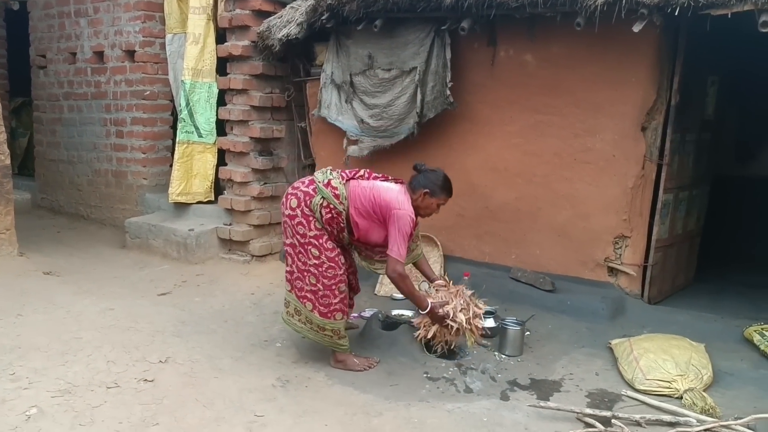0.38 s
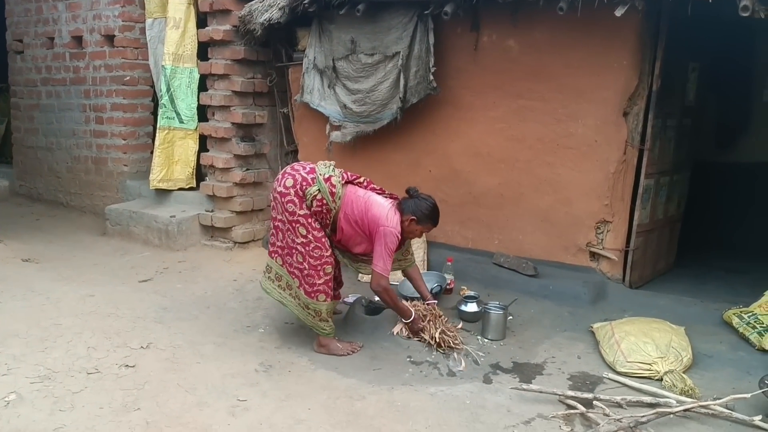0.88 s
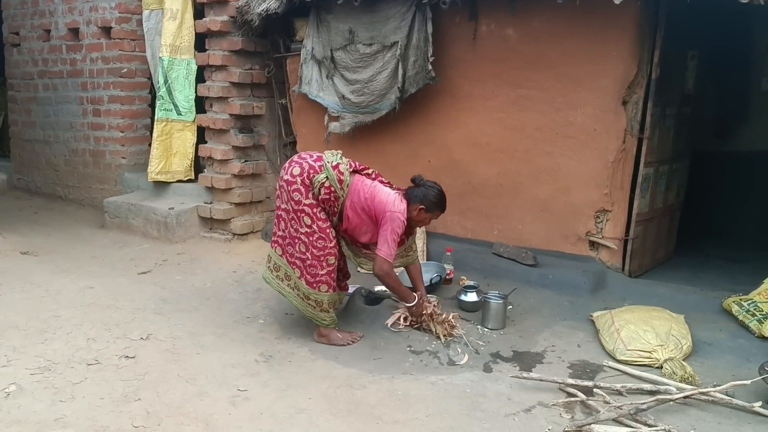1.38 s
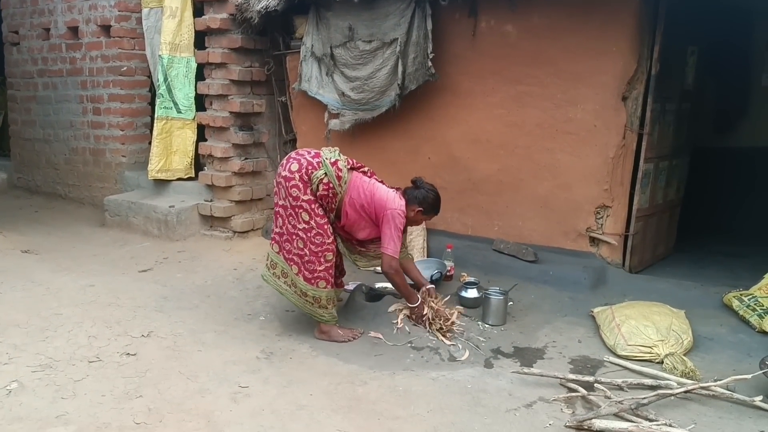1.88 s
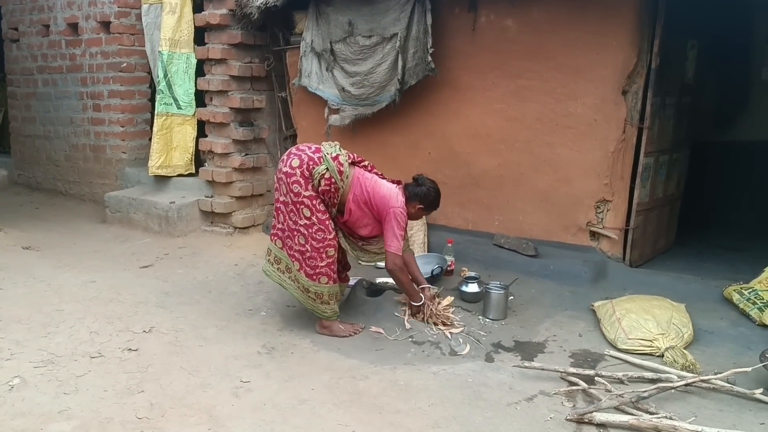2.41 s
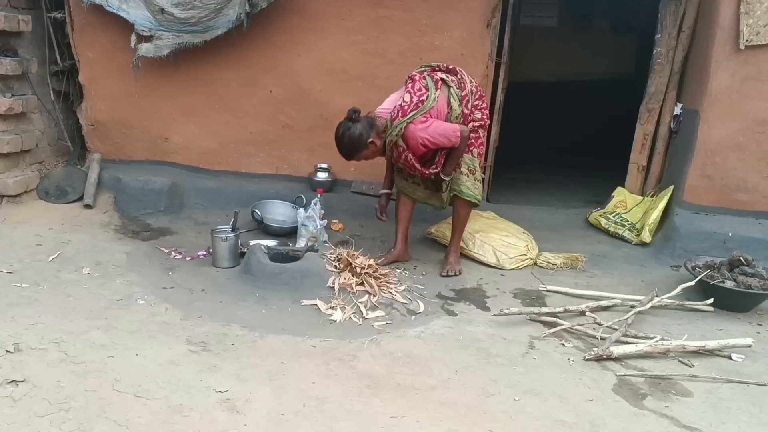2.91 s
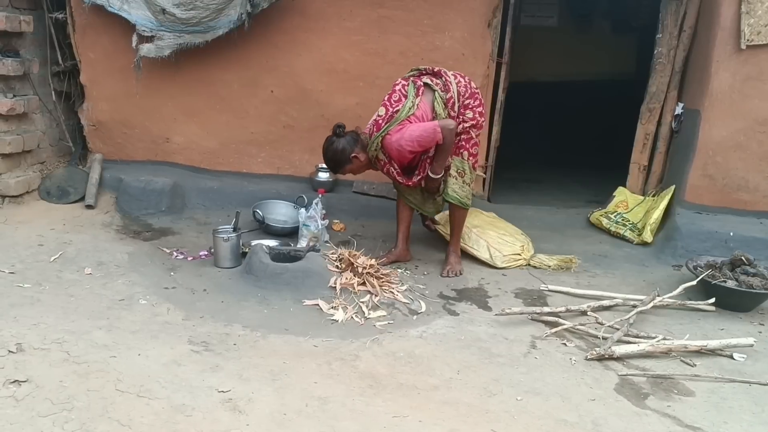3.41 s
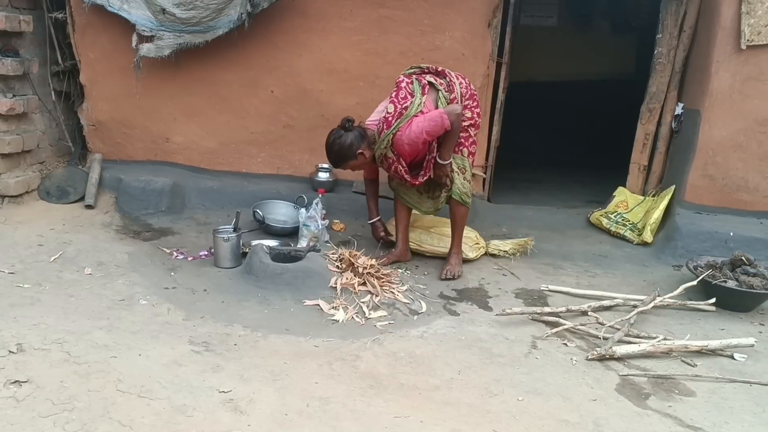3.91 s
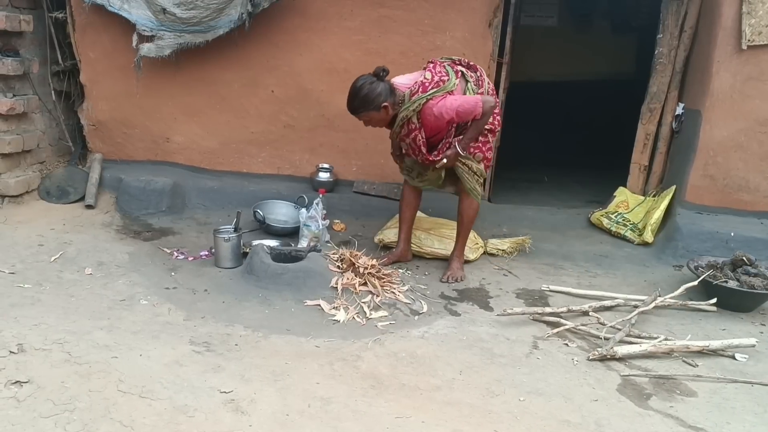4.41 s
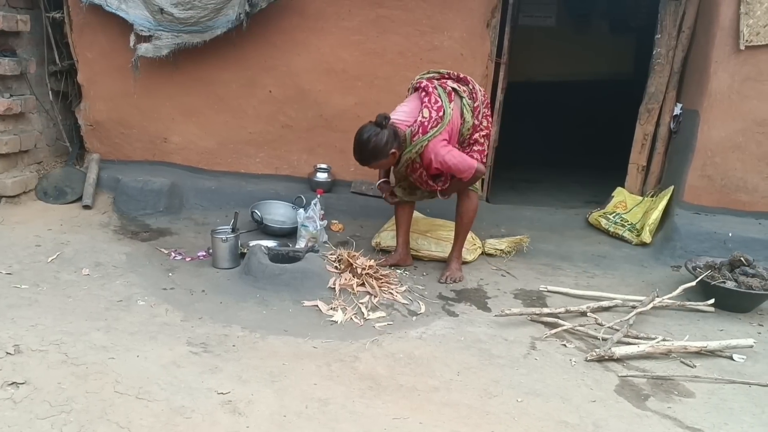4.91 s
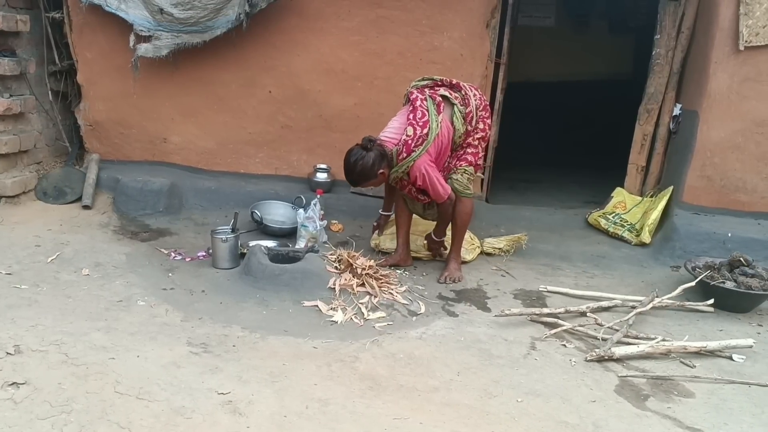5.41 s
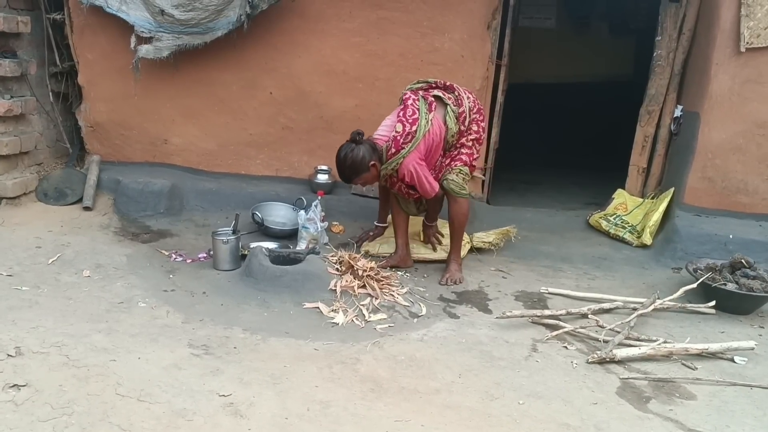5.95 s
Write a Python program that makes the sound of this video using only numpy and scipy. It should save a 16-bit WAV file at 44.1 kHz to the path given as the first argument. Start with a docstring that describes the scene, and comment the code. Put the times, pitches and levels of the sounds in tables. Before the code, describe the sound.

A quiet open yard with very faint airy murmur and a barely audible low drone; short echoes return from ground and mud walls. From 0 s chicks cheep close by, mostly left, in quick falling whistles. Dry husks begin rustling around 0.4 s and crunch strongly at 0.6-0.9, with sharp snaps at 0.78. More bursts come at 1.3-1.5, with snaps and a dull hollow stove boom, then lighter stirring and another crunch at 2.35. A hen clucks and coos at 1.57 and lower at 2.36; a small bird trills at 2.65. At 3.05 the spot changes quickly: chicks become faint, handling much softer. A woven sack scuffs at 3.6-4.2 and 5.5-5.8, with a small pot knock and muffled thump near 4.88. Throbbing rising bird whistles sound at 3.6, 4.1, 4.9, 5.7 and 6.0.

```python
"""Village yard from two spots

First dry husks and leaves are put down and pushed about, then, after a short crossfade to a second spot, a woven
sack is dragged: banded click bursts. Chicks cheep throughout (gliding whistles), a hen clucks and coos softly
(harmonics through a throat resonance), a small bird trills (chopped whistle). A hollow clay stove booms (resonant
noise), stalks snap and a pot is knocked (decaying sines). Noise makes the yard's murmur and a far drone;
ground and walls return short echoes."""
import sys
import numpy as np
from scipy import signal
from scipy.io import wavfile

SR = 44100
rng = np.random.default_rng(int(sys.argv[2]) if len(sys.argv) > 2 else 0)


def linear_from_db(decibels):
    """Turn decibels (scalar or array-like) into linear amplitude factors; 0 gives 1."""
    return 10 ** (np.asarray(decibels, float) / 20)


def store_wav(level_fs):
    """Save 16-bit WAV to argv[1]."""
    pcm = np.round(np.clip(np.atleast_2d(level_fs), -1, 1) * 32767)
    wavfile.write(sys.argv[1], SR, pcm.T.astype(np.int16))


N = 267246

CUT_END_S, CROSSFADE_S = 3.06, .049   # a short crossfade joins the scene at the first spot to that at the second

# yard murmur spectrum: freq_hz, density_db_per_hz
YARD_SPECTRUM = [(18, -42), (30, -2.5), (127, 5.5), (649, -13), (988, -14), (2540, -17.5), (4190, -9.5),
                 (5310, -25), (8300, -52), (10800, -30), (13300, -41), (14800, -35), (16000, -44)]
# murmur level by spot: level_db
YARD_LEVEL_DB = [-66.5, -67.5]
# left-right likeness of yard and rustle: freq_hz, correlation
LIKENESS = [(100, 0.28), (500, 0.35), (2000, 0.34), (8000, 0.084)]
HUM_HZ, HUM_WIDTH_HZ, HUM_DB = 115.6, 8.8, -77.5

# hen clucks and soft coos: start_s, length_s, start_hz, end_hz, level_db
CLUCKS_AND_COOS = [(1.453, .043, 630, 600, -50.5), (1.559, .022, 1100, 1050, -41.5),
                   (1.566, .087, 476, 466, -31), (2.36, .12, 240, 239, -29), (2.967, .11, 746, 700, -63.5),
                   (3.409, .11, 767, 777, -65), (4.291, .11, 797, 807, -65.5)]
HEN_THROAT_HZ, HEN_THROAT_WIDTH_HZ, HEN_PAN_DB = 900, 1000, 3.0   # positive pan: left

# small bird trills: start_s, length_s, start_hz, end_hz, level_db
TRILLS = [(2.636, .22, 2382, 2676, -34), (2.758, .09, 2304, 2176, -34), (3.601, .075, 2643, 2990, -41),
          (4.113, .13, 2753, 3050, -30.5), (4.887, .17, 2640, 3105, -34), (5.431, .26, 2520, 2820, -57),
          (5.675, .15, 2690, 3210, -42), (6.009, .15, 2680, 3350, -31.5)]
TRILL_ATTACK_S, CYCLES_PER_THROB, BIRD_PAN_DB = .014, 9.6, -1.5

# cheeps, and a faint, level whistle of another bird: start_s, length_s, start_hz, end_hz, level_db
CHEEPS = [(.018, .07, 6100, 5130, -59.5), (.003, .17, 2230, 2230, -67), (.07, .06, 7300, 6900, -58),
          (.085, .035, 4400, 3450, -49), (.115, .06, 5800, 4700, -45), (.151, .06, 6150, 5400, -45),
          (.163, .056, 6810, 5130, -51), (.15, .065, 4900, 3400, -33), (.398, .052, 5700, 5000, -51),
          (.4, .055, 7250, 6700, -53), (.455, .04, 4400, 3500, -35), (.48, .05, 4300, 3300, -35),
          (.81, .04, 4200, 4250, -37), (.85, .035, 4600, 3100, -33), (.992, .03, 6520, 6350, -50),
          (1.084, .036, 4500, 3450, -31), (1.135, .04, 4400, 3300, -33), (1.175, .045, 4400, 2800, -31),
          (1.166, .04, 5000, 3900, -34), (1.262, .055, 4750, 4150, -33), (1.438, .03, 4800, 4000, -35),
          (1.488, .061, 4600, 4350, -43), (1.553, .053, 4400, 2960, -38), (1.556, .06, 5000, 4000, -34),
          (1.61, .055, 4500, 3300, -32), (1.58, .05, 4450, 3600, -34), (1.797, .036, 6480, 6340, -50.5),
          (1.86, .035, 4100, 2750, -36), (1.894, .038, 5150, 4200, -33.5), (1.938, .053, 4600, 2840, -34),
          (1.945, .045, 4900, 4200, -33), (2.09, .05, 4400, 4000, -34), (2.126, .045, 4300, 3250, -27),
          (2.175, .035, 4200, 3100, -38), (2.275, .02, 6100, 5900, -46), (2.29, .06, 5200, 3000, -35),
          (2.345, .065, 4200, 3750, -34), (2.478, .035, 4300, 3400, -25), (2.585, .035, 4300, 3250, -39),
          (2.72, .03, 6100, 5000, -48), (2.745, .085, 5000, 3300, -36), (2.85, .07, 5800, 4300, -55),
          (2.827, .076, 3400, 3400, -51), (2.92, .055, 4150, 4110, -36), (2.99, .03, 4250, 4100, -42),
          (3.015, .038, 4200, 3450, -39), (3.01, .029, 5000, 4350, -52.5), (3.14, .08, 5300, 4400, -67),
          (3.154, .11, 6400, 5100, -73), (3.258, .1, 4400, 2950, -65), (3.282, .067, 5300, 5130, -63.5),
          (3.319, .04, 5250, 3650, -56), (3.397, .051, 5400, 3650, -64.5), (3.432, .06, 6500, 6350, -74),
          (3.497, .06, 4480, 4450, -60), (3.526, .07, 3860, 3340, -61), (3.645, .033, 5450, 5100, -67),
          (3.8, .03, 4600, 4100, -63), (3.915, .07, 5600, 5100, -61), (3.94, .035, 4690, 4170, -58),
          (4.166, .055, 4800, 3460, -58.5), (4.2, .11, 5480, 5100, -67), (4.255, .076, 4580, 3480, -67),
          (4.284, .068, 5100, 3550, -61.5), (4.412, .041, 4130, 3480, -62.5), (4.44, .035, 4900, 4000, -54),
          (4.487, .055, 3720, 3150, -65.5), (4.542, .05, 4450, 4020, -63.5), (4.665, .06, 5750, 5300, -55),
          (4.7, .07, 5200, 4450, -58), (4.72, .07, 5350, 5200, -64), (4.785, .06, 4170, 3220, -62),
          (4.882, .063, 5560, 5150, -59.5), (4.923, .018, 5300, 4000, -63), (4.97, .06, 5280, 3800, -67),
          (5.095, .091, 4700, 2980, -72), (5.221, .15, 4100, 3170, -64.5), (5.25, .053, 5000, 3500, -65),
          (5.261, .073, 5630, 4770, -65.5), (5.405, .08, 5350, 5200, -68), (5.543, .048, 4870, 3820, -63.5),
          (5.87, .05, 5400, 5000, -65), (5.962, .07, 4100, 3540, -67), (5.999, .06, 4350, 4100, -59)]
# cheeps that hold their pitch, then fall: start_s, length_s, level_db
HELD_CHEEPS = [(.073, .135, -37), (.39, .115, -39), (.69, .096, -36), (1.051, .12, -36), (1.769, .125, -36),
               (2.406, .11, -44), (2.718, .096, -43)]
HELD_START_HZ, HELD_END_HZ = 4600, 3420
HELD_CHEEP_SHARE, CHEEP_SHARE = .92, .56   # share of the fall still ahead at half time
# loudest far cheeps by spot: level_db
FAR_CHICKS_DB = [-62, -75]
CHICK_THROAT_HZ, CHICK_THROAT_WIDTH_HZ = 3920, 3250
BROOD_PAN_DB, BROOD_PAN_SPREAD_DB = -6.5, 2.5

KNOCK_S, KNOCK_DB = 4.87, -41
# pot modes: freq_hz, level_db, t60_s
POT_MODES = [(700, 7, 0.16), (871, 6, 0.17), (1600, -11, 0.16)]
# snapping stalks, the first one heard again 11 ms later as an echo: start_s, level_db, pan_db
SNAPS = [(.7803, -12, -1), (.7912, -18, -2), (1.4401, -19, 0), (.2423, -50, -1), (.2783, -50, 0),
         (5.372, -50, -1), (.5297, -38, 0), (.5581, -34, -1), (1.352, -26, 0), (1.365, -24, -1),
         (3.735, -50, 0), (4.7127, -50, -6), (5.3313, -56, -1)]
# stalk modes: freq_hz, width_hz, level_db
STALK_MODES = [(1550, 2100, -41), (2300, 500, 24), (3540, 330, 18), (6000, 1500, 29.5), (7840, 1100, -2),
               (10600, 3200, -21), (14290, 2000, -18)]

# stove booms when the ground beside it is jolted: start_s, hold_s, level_db
BOOMS = [(0.0, .04, -64), (.39, .02, -66.5), (.72, .02, -60.5), (.93, .02, -61.5), (1.3, .075, -50.5),
         (1.47, .07, -54.5), (1.84, .03, -68), (2.33, .05, -64), (2.42, .02, -53), (2.63, .02, -63),
         (4.13, .05, -66), (4.71, .02, -71), (4.89, .07, -59), (5.33, .04, -70), (5.57, .02, -52)]
STOVE_HZ, STOVE_WIDTH_HZ = 230, 51   # air in the hollow clay stove
BOOM_RISE_DB_PER_S, BOOM_FADE_DB_PER_S = 260, 330

# drags, and a faint steady low stirring under them: start_s, hold_s, level_db
DRAGS = [(.55, 2.4, -78), (.72, .03, -69), (1.09, .05, -73), (1.33, .045, -56), (1.59, .02, -57.5),
         (2.39, .05, -55), (3.1, 2.96, -88), (3.74, .09, -67), (3.85, .32, -71), (4.02, .03, -66),
         (4.12, .04, -68), (4.71, .01, -77), (4.88, .04, -73), (5.5, .34, -77)]
DRAG_RISE_DB_PER_S, DRAG_FADE_DB_PER_S = 250, 330
SACK_HZ, SACK_WIDTH_HZ, SACK_HUM_DB = 541.4, 130, 6.5   # level relative to the drag
# pushes at husks, later the sack, and a faint steady stirring under them:
# start_s, hold_s, crunch_db, fine_crackle_db, fade_db_per_s
PUSHES = [(0.0, .4, -83, -72, 100), (.43, .04, -74, -61, 100), (.5, .04, -64, -57, 100),
          (.6, .09, -51, -47.5, 100), (.73, .11, -45, -41.5, 70), (1.0, 1.8, -69, -65, 35),
          (1.31, .075, -42, -42, 300), (1.45, .02, -49, -49, 200), (1.52, .11, -53, -56.5, 150),
          (1.83, .03, -51.5, -54, 90), (1.95, .3, -69, -64, 90), (2.35, .07, -44, -48, 200),
          (2.58, .2, -69, -59, 60), (3.1, 2.96, -84, -90, 100), (3.6, .1, -71, -76, 30),
          (3.75, .04, -61.5, -67, 60), (3.85, .33, -64, -74.5, 250), (4.7, .015, -66, -75, 400),
          (4.88, .03, -69, -90, 200), (5.5, .32, -70, -81, 100)]
PUSH_RISE_DB_PER_S = 220
# bands of drag, crunch, fine crackle: low_hz, high_hz
PART_BANDS = [(300, 430), (1150, 2100), (6800, 15500)]
# borders between those parts: freq_hz
PART_EDGES_HZ = [1050, 5000]
# husk spectrum: freq_hz, density_db_per_hz
HUSK_SPECTRUM = [(59, -59), (100, -29), (215, -11), (343, -14.5), (705, -8), (818, -24.5), (1280, 9.5),
                 (1550, 15.5), (3540, 16.5), (4980, -3.5), (5900, -4.5), (8830, -11), (15000, -13),
                 (16000, -6)]
# sack spectrum: freq_hz, density_db_per_hz
SACK_SPECTRUM = [(59, -36), (100, -26), (322, -10.5), (406, -29), (547, -1), (691, -31), (1230, -11),
                 (1390, -19.5), (1950, -11.5), (3320, -16), (9820, -37), (13200, -55), (15000, -37),
                 (16000, -36)]
BASE_GRAINS_PER_S, BURST_GAIN, GRAIN_SPREAD_DB = 3000, .8, 4.0

ECHO_T60_S, ECHO_DB = .16, -3.5
# house wall delay by spot: delay_s
SLAP_DELAY_S = [.0197, .0097]
# house wall level at left, right: level_db
SLAP_LEVEL_DB = [-6, -12]
EAR_LAG_S_PER_DB = 0.00004   # lag at the far port per dB of pan
# microphone peaks and dips: freq_hz, width_hz, gain_db
MICROPHONE = [(5100, 400, -2.5), (6210, 2100, 5), (8530, 750, -4.5), (13500, 2100, -7), (15160, 1400, 12)]


def second_spot():
    """Share of the second spot over time: rises from 0 to 1 in the crossfade."""
    return np.clip((np.arange(N) / SR - CUT_END_S) / CROSSFADE_S + 1, 0, 1)


def at_hz(points, hz):
    """Read a spectrum on a log-frequency axis."""
    freq_hz, value = np.array(points).T
    return np.interp(np.log(hz), np.log(freq_hz), value)


def density_db(spectrum, hz, band_hz):
    """Gain at hz that gives white noise of rms 1 a level of 0 dB in the band."""
    grid_hz = np.linspace(*band_hz, num=200)
    mean_power = np.mean(linear_from_db(at_hz(spectrum, grid_hz)) ** 2)
    return at_hz(spectrum, hz) - 10 * np.log10(mean_power * (band_hz[1] - band_hz[0]) * 2 / SR)


def drift(rate_hz):
    """Slow curve through normal random points, two per cycle of rate_hz."""
    knots = np.arange(0, N + SR, SR / rate_hz / 2)
    return np.interp(np.arange(N), knots, rng.standard_normal(len(knots)))


def wobble(size, points_per_s):
    """Short curve through normal random points."""
    return np.interp(np.arange(size) * points_per_s / SR, np.arange(200), rng.standard_normal(200))


def flutter(size, points_per_s, depth_db):
    """Wavering gain of mean power 1."""
    gain = linear_from_db(depth_db * wobble(size, points_per_s))
    return gain / np.sqrt(np.mean(gain ** 2))


def tone(hz):
    """Sine whose phase is the running sum of its frequency."""
    return np.sin(2 * np.pi * np.cumsum(hz) / SR)


def resonant_noise(hz, width_hz):
    """Noise twice through one resonance; rms 1."""
    r = np.exp(-np.pi * width_hz / SR)
    section = [1, 0, -1, 1, -2 * r * np.cos(2 * np.pi * hz / SR), r * r]
    sound = signal.sosfilt([section, section], rng.standard_normal(N))
    return sound / sound.std()


def ring(modes, size):
    """Decaying sines of freq_hz, level_db, t60_s with random strength and phase; peak 1."""
    t = np.arange(size) / SR
    sound = np.zeros(size)
    for hz, db, t60_s in modes:
        decay = linear_from_db(db + rng.normal(0, 2) - 60 * t / t60_s)
        sound += decay * np.sin(2 * np.pi * (hz * t + rng.random()))
    return sound / np.abs(sound).max()


def add(out, start_s, sound, pan_db):
    """Mix in a short sound, louder and earlier on the near side."""
    for side, sign in enumerate((.5, -.5)):
        lag_s = max(-2 * sign * pan_db, 0) * EAR_LAG_S_PER_DB
        at = round((start_s + lag_s) * SR)
        out[side, at:at + len(sound)] += (sound * linear_from_db(sign * pan_db))[:max(N - at, 0)]


def strokes(rows, rise_db_per_s):
    """Power sum of swells that rise, hold and fade; those begun at the first spot end in the crossfade."""
    t = np.arange(0, N, 32) / SR
    first = np.clip((CUT_END_S - t) / CROSSFADE_S, 0, 1)
    power = np.zeros(len(t))
    for start_s, hold_s, db, fade_db_per_s in rows:
        rise_db = rise_db_per_s * np.maximum(start_s - t, 0)
        fade_db = fade_db_per_s * np.maximum(t - start_s - hold_s, 0)
        gate = first ** 2 if start_s < CUT_END_S else 1
        power += linear_from_db(db - rise_db - fade_db) ** 2 * gate
    return np.interp(np.arange(N) / SR, t, np.sqrt(power))


def wide_bands(streams, gain_at):
    """Shape four streams in narrow log-spaced bands; mid and side shares set the left-right likeness."""
    pairs = streams.reshape(2, 2, N)
    out = np.zeros((2, N))
    edges_hz = np.geomspace(45, 17000, num=23)
    for k, (low, high) in enumerate(zip(edges_hz, edges_hz[1:])):
        hz = np.sqrt(low * high)
        band = signal.butter(2, [low, high], "band", fs=SR, output="sos")
        mid, side = signal.sosfilt(band, gain_at(hz) * pairs[k % 2])   # neighbour bands use other streams
        alike = np.clip(at_hz(LIKENESS, hz), -1, 1)
        out += np.sqrt(1 + alike) * mid + np.sqrt(1 - alike) * side * [[1], [-1]]
    return out / np.sqrt(2)


def far_drone():
    """Faint far drone: narrow resonant noise."""
    return linear_from_db(HUM_DB) * resonant_noise(HUM_HZ, HUM_WIDTH_HZ)


def yard_murmur():
    """Wide noise with the yard's spectrum, each band drifting slightly."""
    level = linear_from_db(YARD_LEVEL_DB[0] + (YARD_LEVEL_DB[1] - YARD_LEVEL_DB[0]) * second_spot())

    def gain_at(hz):
        return level * linear_from_db(density_db(YARD_SPECTRUM, hz, (30, 16000)) + 0.5 * drift(4.6))

    return wide_bands(rng.standard_normal((4, N)), gain_at)


def clucks_and_coos():
    """Harmonics of a slightly unsteady pitch, weighted by one throat resonance."""
    out = np.zeros((2, N))
    for start_s, length_s, start_hz, end_hz, db in CLUCKS_AND_COOS:
        u = np.linspace(0, 1, round(length_s * SR))
        unsteady = 1 + 0.029 * (1 - u) ** 5.8 + 0.0089 * wobble(len(u), 60.0)
        turns = np.cumsum((start_hz + (end_hz - start_hz) * u) * unsteady) / SR
        voice = np.zeros(len(u))
        for k in range(1, 9):
            throat = 1 / (1 + (2 * (k * start_hz - HEN_THROAT_HZ) / HEN_THROAT_WIDTH_HZ) ** 2)
            voice += throat * np.sin(2 * np.pi * k * turns + k * k)
        swell = np.sin(np.pi * u ** 0.8) ** 1.52 * flutter(len(u), 60.0, depth_db=2.5)
        add(out, start_s, linear_from_db(db) * swell * voice / np.abs(voice).max(), HEN_PAN_DB)
    return out


def small_bird():
    """Gliding whistle chopped into fast uneven throbs: sharp start, long fade."""
    out = np.zeros((2, N))
    for start_s, length_s, start_hz, end_hz, db in TRILLS:
        u = np.linspace(0, 1, round(length_s * SR))
        throb_hz = start_hz / CYCLES_PER_THROB * (1 + 0.19 * wobble(len(u), 142.0))
        throbs = np.cumsum(throb_hz) / SR
        chop = np.abs(np.sin(np.pi * throbs)) ** 3.55 * flutter(len(u), 250.0, depth_db=6.0)
        attack = np.minimum(u * length_s / TRILL_ATTACK_S, 1)
        swell = attack * linear_from_db(-27 * u) * np.minimum((1 - u) / 0.067, 1)
        hz = start_hz + (end_hz - start_hz) * u ** 0.43
        add(out, start_s, linear_from_db(db) * swell * chop * tone(hz), BIRD_PAN_DB)
    return out


def far_brood(count):
    """Random cheeps of chicks farther off, in the columns of CHEEPS."""
    when, length, pitch, fall, level = rng.random((count, 5)).T
    start_s, length_s = when * (N / SR), 0.046 + 0.078 * length
    start_hz = 4200 + 1900 * pitch
    end_hz = start_hz - 600 - 900 * fall
    db = np.where(start_s + length_s < CUT_END_S, *FAR_CHICKS_DB) - 2.7 * level
    return np.transpose([start_s, length_s, start_hz, end_hz, db])


def brood():
    """All cheeps and the level whistle: start_s, length_s, start_hz, end_hz, level_db, held_share."""
    held = [(start_s, length_s, HELD_START_HZ, HELD_END_HZ, db, HELD_CHEEP_SHARE)
            for start_s, length_s, db in HELD_CHEEPS]
    return held + [(*row, CHEEP_SHARE) for row in [*CHEEPS, *far_brood(count=70)]]


def chicks():
    """Whistles on a bent pitch path (one stays level), each swelling, fluttering a little and fading."""
    out = np.zeros((2, N))
    for start_s, length_s, start_hz, end_hz, db, held in brood():
        middle_hz = end_hz + held * (start_hz - end_hz)
        pan_db = BROOD_PAN_DB + BROOD_PAN_SPREAD_DB * rng.standard_normal()
        u = np.linspace(0, 1, round(length_s * SR))
        # parabola through start, middle and end
        hz = 2 * (u - .5) * (u - 1) * start_hz - 4 * u * (u - 1) * middle_hz + 2 * u * (u - .5) * end_hz
        hz = hz * (1 + 0.0071 * wobble(len(u), 141.6))
        swell = np.sin(np.pi * u ** 1.15) ** 0.4 * linear_from_db(0.7) * flutter(len(u), 143.3, depth_db=4.0)
        throat = 1 / (1 + (2 * (hz - CHICK_THROAT_HZ) / CHICK_THROAT_WIDTH_HZ) ** 2)
        add(out, start_s, linear_from_db(db) * swell * throat / throat.max() * tone(hz), pan_db)
    return out


def without_lows(x):
    """High-pass at 600 Hz."""
    return signal.sosfilt(signal.butter(2, 600, "high", fs=SR, output="sos"), x)


def pot_knock():
    """A pot knocked once, softly: ringing modes with a short ramp at the start."""
    out = np.zeros((2, N))
    ramp = np.minimum(np.arange(9000) / (0.0035 * SR), 1)
    add(out, KNOCK_S, linear_from_db(KNOCK_DB) * ring(POT_MODES, size=9000) * ramp, 0)
    return without_lows(out)


def stalk_snaps():
    """Brittle stalks break with a ring of a few milliseconds; wider modes die sooner."""
    out = np.zeros((2, N))
    modes = [(hz, db, np.log(1000) / np.pi / width_hz) for hz, width_hz, db in STALK_MODES]
    for start_s, db, pan_db in SNAPS:
        add(out, start_s, linear_from_db(db) * ring(modes, size=600), pan_db)
    return without_lows(out)


def clay_stove():
    """Jolts set off the stove's air resonance: resonant noise under swells."""
    booms = strokes([(*row, BOOM_FADE_DB_PER_S) for row in BOOMS], BOOM_RISE_DB_PER_S)
    return booms * resonant_noise(STOVE_HZ, STOVE_WIDTH_HZ)


def drag_gain():
    """Level of the drags and the low stirring under them."""
    return strokes([(*row, DRAG_FADE_DB_PER_S) for row in DRAGS], DRAG_RISE_DB_PER_S)


def sack_hum():
    """The half-empty sack hums with the drags and stirring: resonant noise, second spot only."""
    return linear_from_db(SACK_HUM_DB) * second_spot() * drag_gain() * resonant_noise(SACK_HZ, SACK_WIDTH_HZ)


def grains():
    """Four streams of uneven clicks over weak noise; a piece that gives way sets off a burst that thins out."""
    gives = (rng.random(N) < 45.0 / SR) * rng.exponential(1, N)
    bursts = signal.lfilter([1], [1, -np.exp(-1 / (0.0089 * SR))], gives + 1e-18)
    born = rng.random((4, N)) < BASE_GRAINS_PER_S * (1 + BURST_GAIN * bursts) / SR
    size = linear_from_db(GRAIN_SPREAD_DB * np.minimum(rng.exponential(1, (4, N)), 5))
    clicks = born * size * rng.choice([-1, 1], (4, N))
    return clicks / clicks.std() + .3 * rng.standard_normal((4, N))


def rustle():
    """Grains of husks, then sack, through bands: drag lowest, crunch between, fine crackle highest."""
    second = second_spot()
    crunch = [(start_s, hold_s, db, fade) for start_s, hold_s, db, _, fade in PUSHES]
    fine = [(start_s, hold_s, db, fade) for start_s, hold_s, _, db, fade in PUSHES]
    parts = [drag_gain(), strokes(crunch, PUSH_RISE_DB_PER_S), strokes(fine, PUSH_RISE_DB_PER_S)]

    def gain_at(hz):
        part = np.searchsorted(PART_EDGES_HZ, hz)
        husks = linear_from_db(density_db(HUSK_SPECTRUM, hz, PART_BANDS[part]))
        sack = linear_from_db(density_db(SACK_SPECTRUM, hz, PART_BANDS[part]))
        return parts[part] * (husks + (sack - husks) * second) * linear_from_db(2.0 * drift(12.0))

    return wide_bands(grains(), gain_at)


def walls(x):
    """Scattered echoes off ground and mud walls, other ones for each ear."""
    t = np.arange(round(.3 * SR)) / SR
    sparse = rng.standard_normal((2, len(t))) * (rng.random((2, len(t))) < .025)
    echo = sparse * linear_from_db(-60 * t / ECHO_T60_S) * (t > .003)
    echo /= np.sqrt((echo ** 2).sum(axis=1, keepdims=True))
    return linear_from_db(ECHO_DB) * signal.fftconvolve(x, echo, axes=1)[:, :N]


def house_wall(x):
    """One clear slap off the house front: delayed right channel, heard more on the left."""
    at, second = np.arange(N), second_spot()
    slap = np.zeros(N)
    for share, delay_s in zip((1 - second, second), SLAP_DELAY_S):
        slap += share * np.interp(at - delay_s * SR, at, x[1], left=0)
    return linear_from_db(np.array(SLAP_LEVEL_DB))[:, None] * slap


def scene():
    """Calls, snaps and knock get echoes; the whistles also slap off the house; the rest stays dry."""
    background = far_drone() + yard_murmur()
    clucks = clucks_and_coos()
    whistles = small_bird() + chicks()
    breaks = pot_knock() + stalk_snaps()
    handled = clay_stove() + sack_hum() + rustle()
    echoes = house_wall(whistles) + walls(whistles + linear_from_db(-6) * (breaks + clucks))
    return background + clucks + whistles + breaks + echoes + handled


def band_limit(x):
    """A steep low-pass at the top of the band."""
    return signal.sosfilt(signal.butter(12, 16810, fs=SR, output="sos"), x)


def record(dry):
    """Microphone with treble peaks and dips, then a low-pass."""
    for hz, width_hz, db in MICROPHONE:
        cos_w, lift = np.cos(2 * np.pi * hz / SR), linear_from_db(db / 2)
        damp = np.tan(np.pi * width_hz / SR)
        zeros = [1 + damp * lift, -2 * cos_w, 1 - damp * lift]
        poles = [1 + damp / lift, -2 * cos_w, 1 - damp / lift]
        dry = signal.lfilter(zeros, poles, dry)
    finished = signal.sosfilt(signal.cheby2(12, 60, 16500, fs=SR, output="sos"), dry)
    return band_limit(finished)


dry = scene()
out = record(dry)
store_wav(out)
```